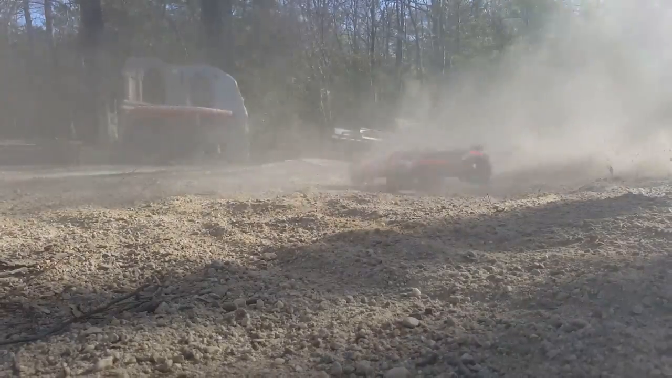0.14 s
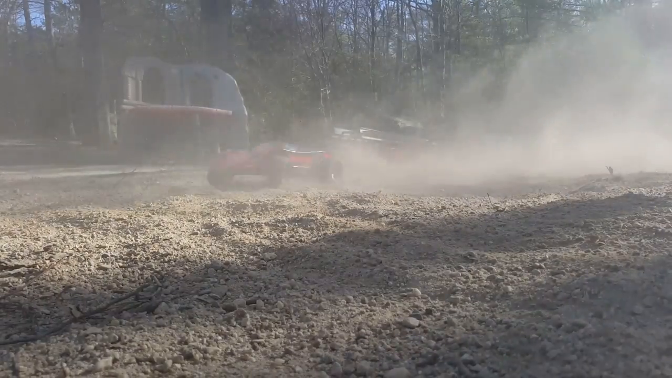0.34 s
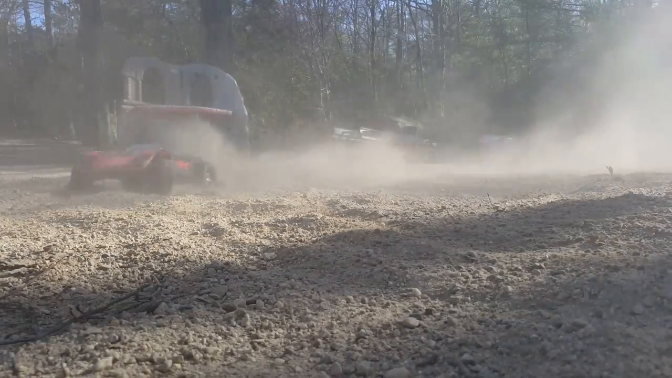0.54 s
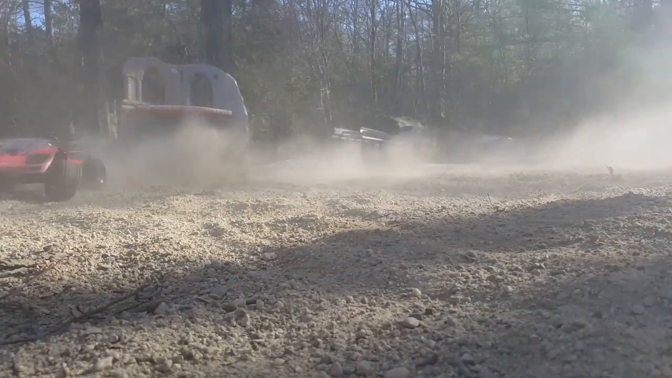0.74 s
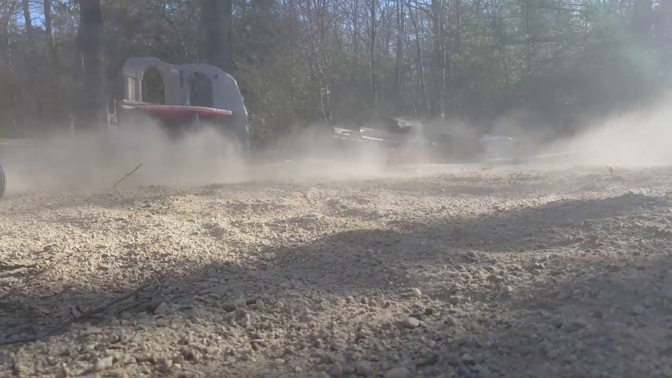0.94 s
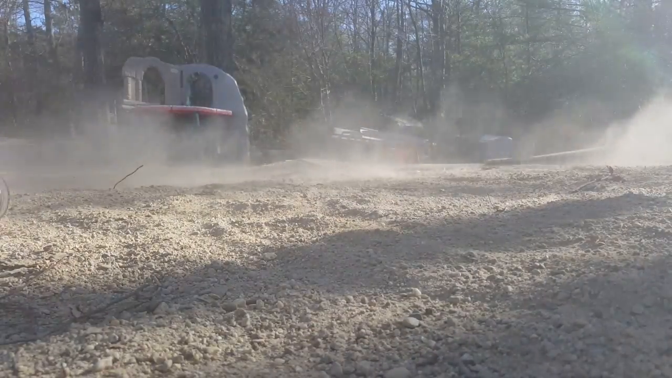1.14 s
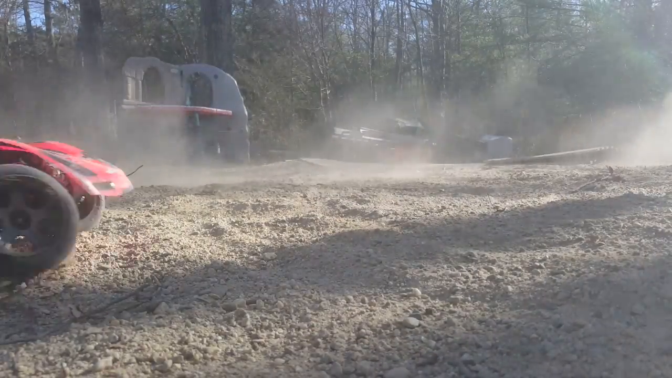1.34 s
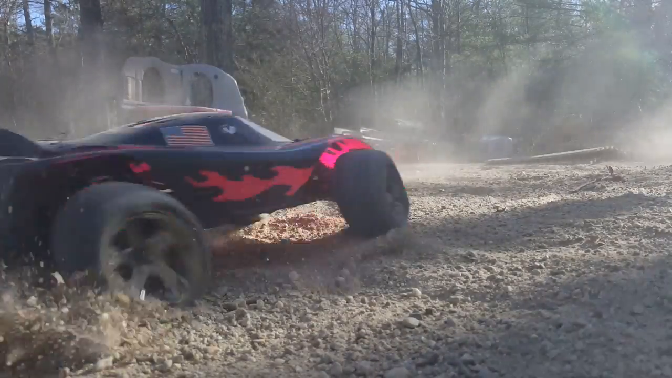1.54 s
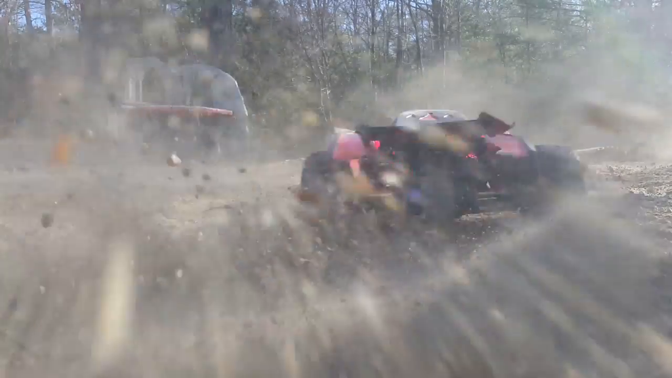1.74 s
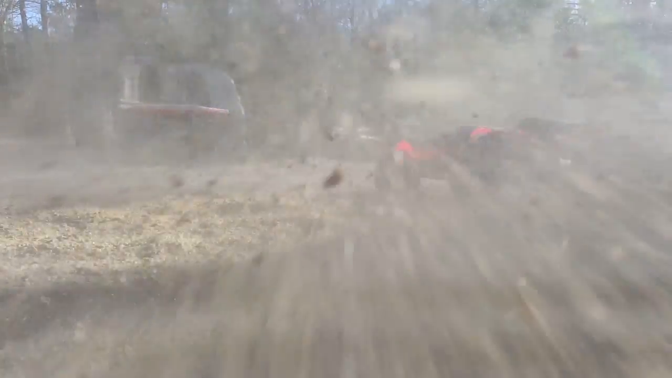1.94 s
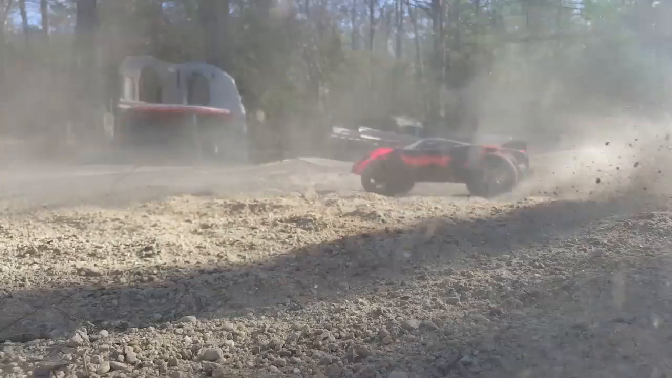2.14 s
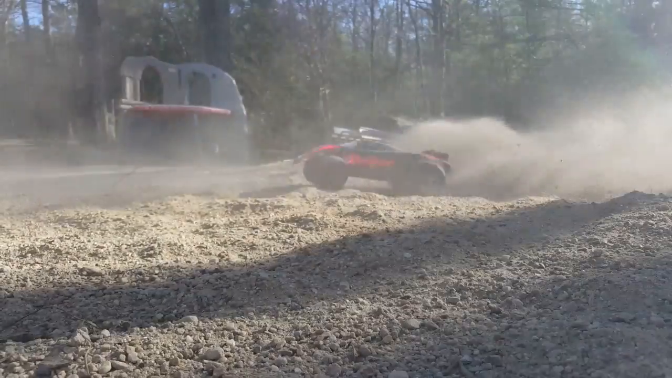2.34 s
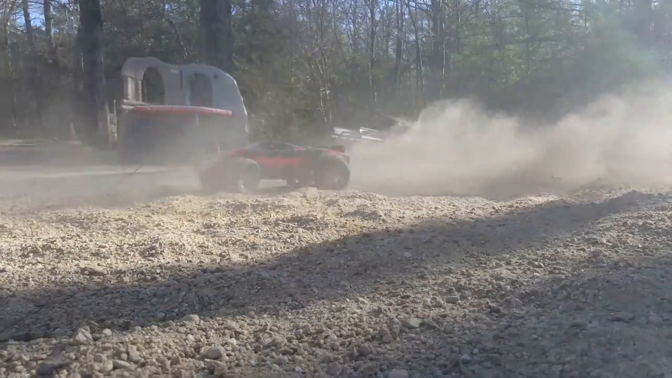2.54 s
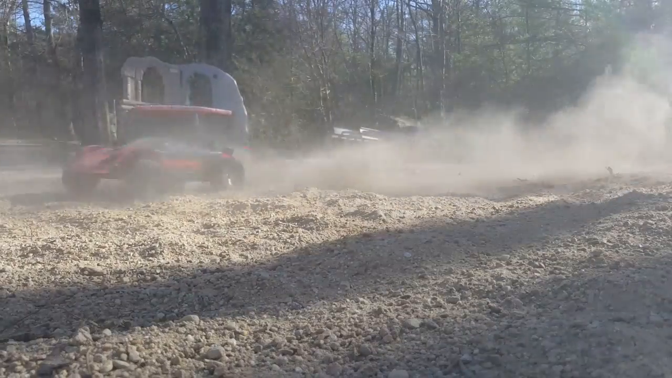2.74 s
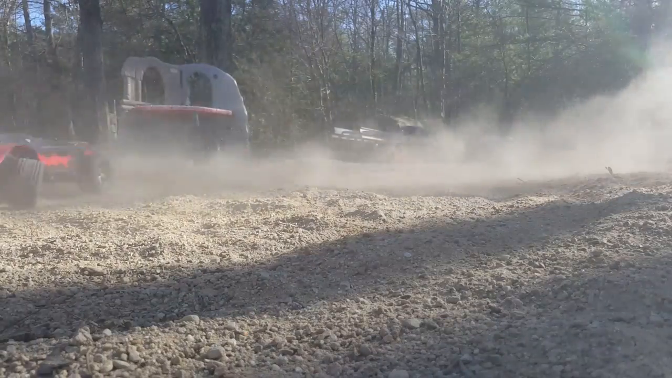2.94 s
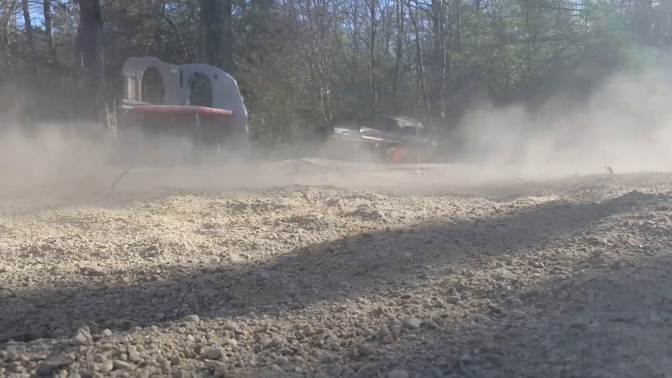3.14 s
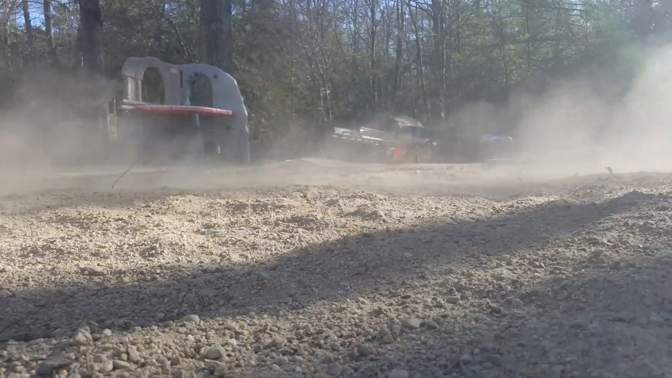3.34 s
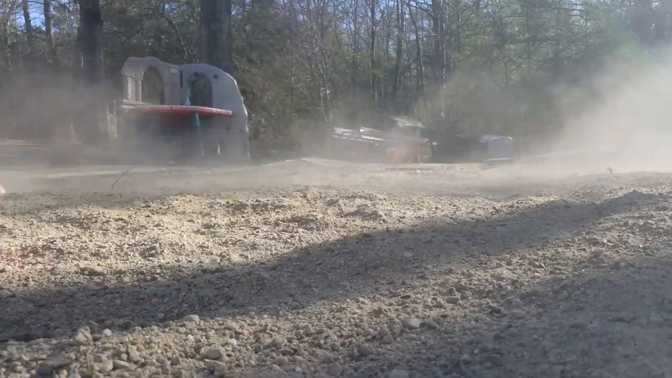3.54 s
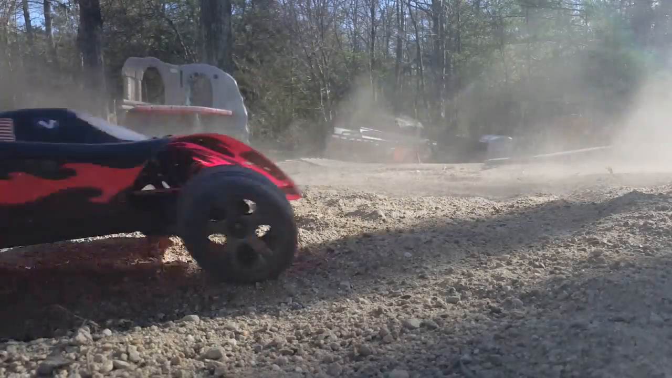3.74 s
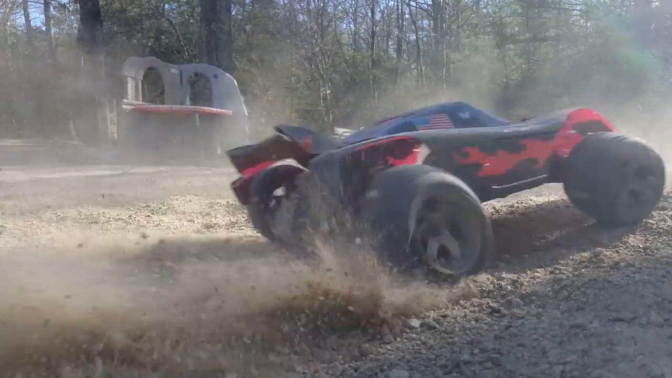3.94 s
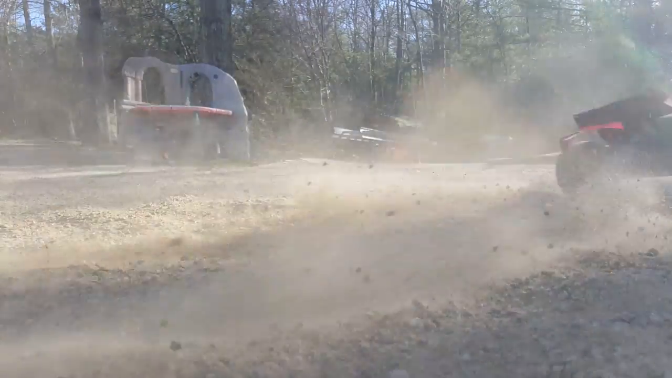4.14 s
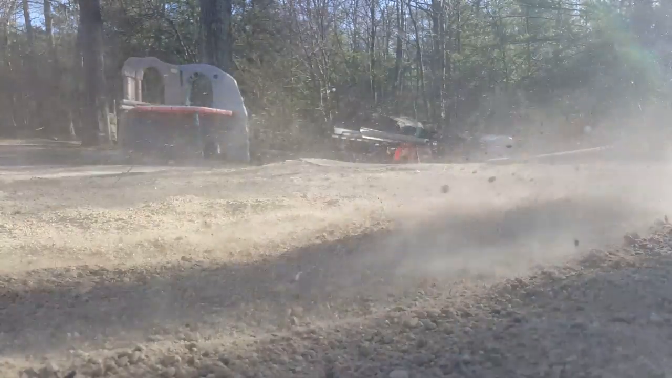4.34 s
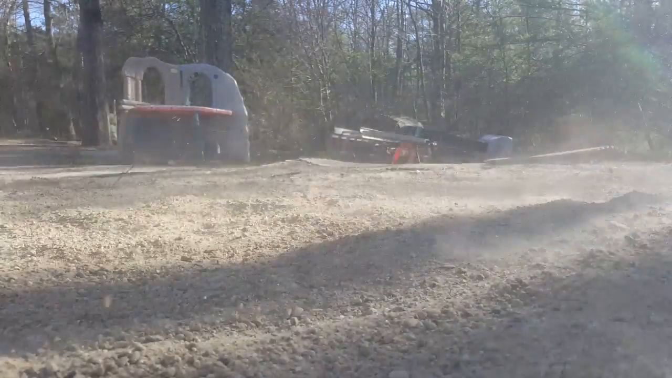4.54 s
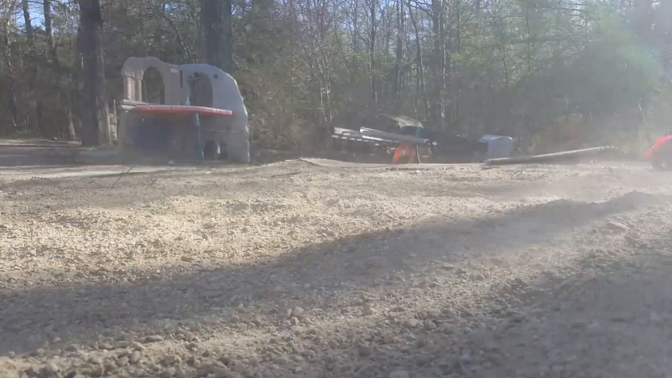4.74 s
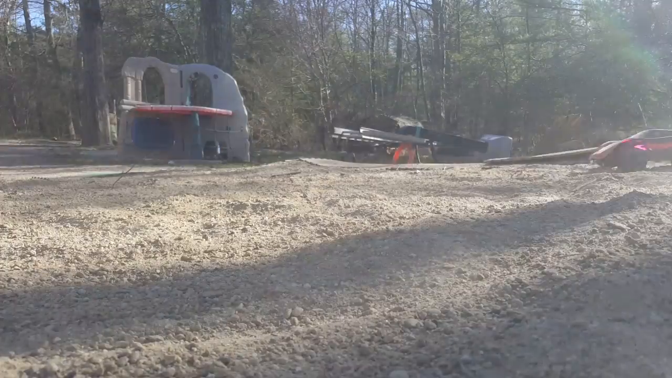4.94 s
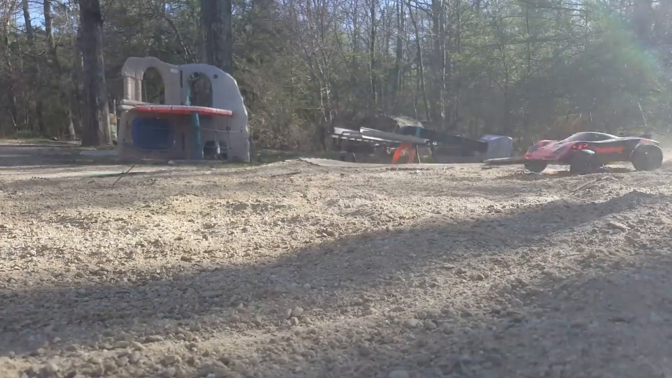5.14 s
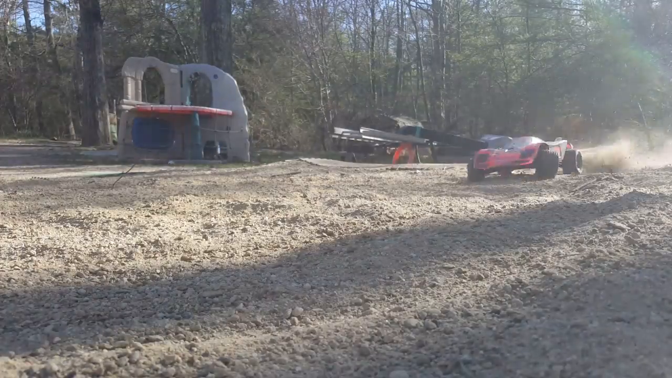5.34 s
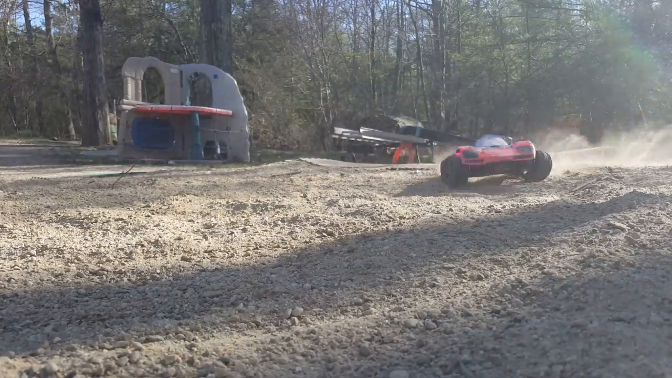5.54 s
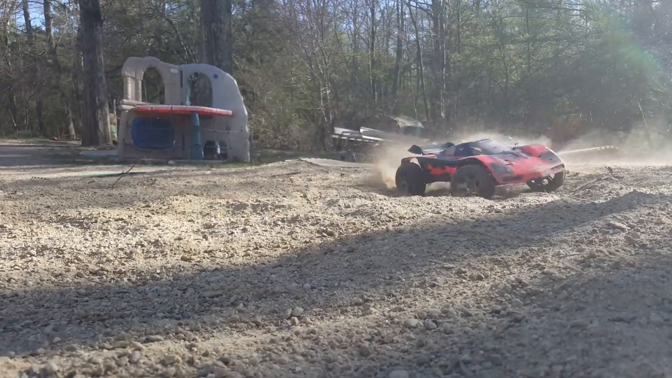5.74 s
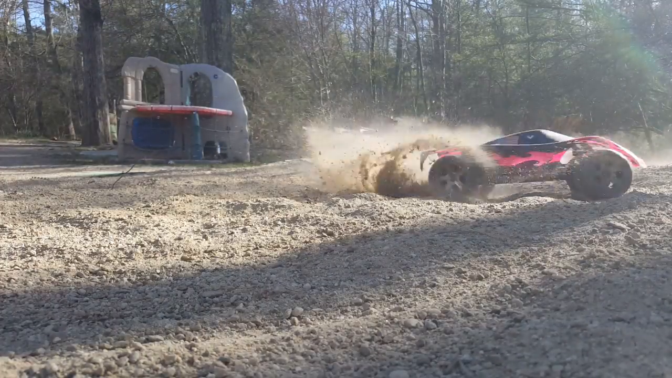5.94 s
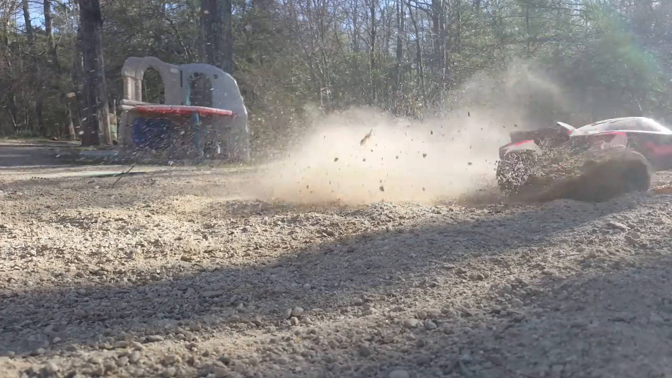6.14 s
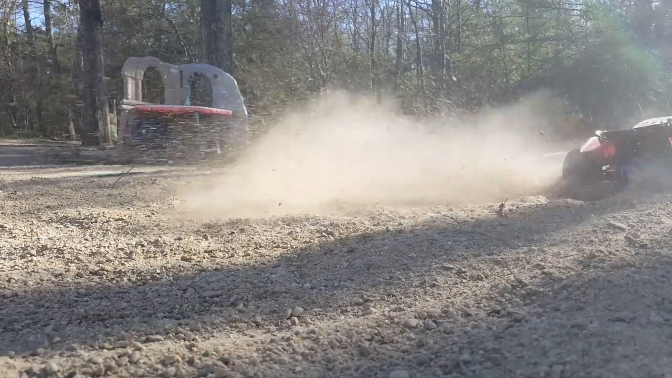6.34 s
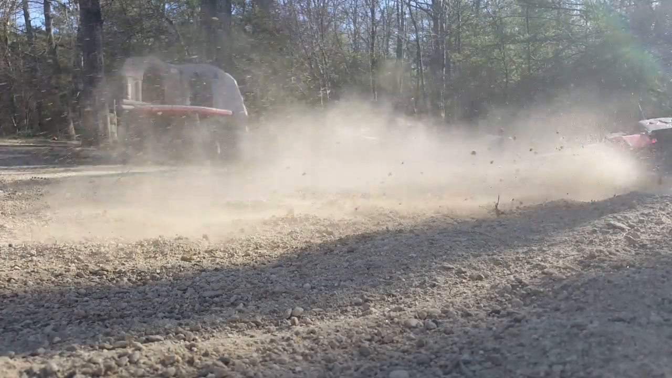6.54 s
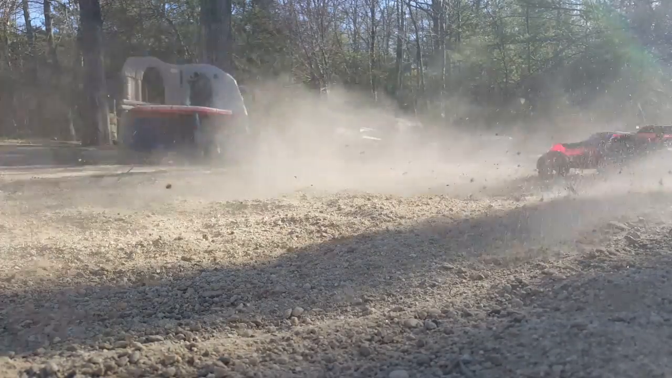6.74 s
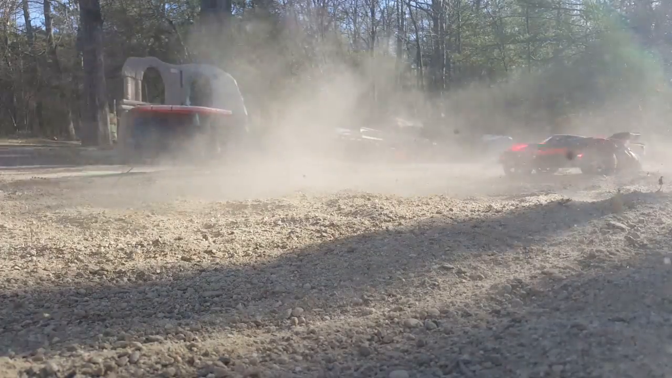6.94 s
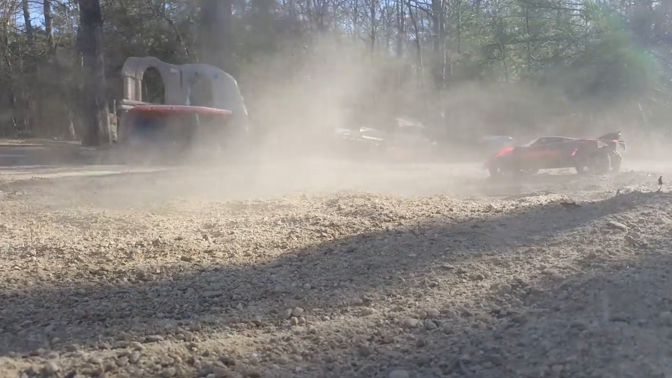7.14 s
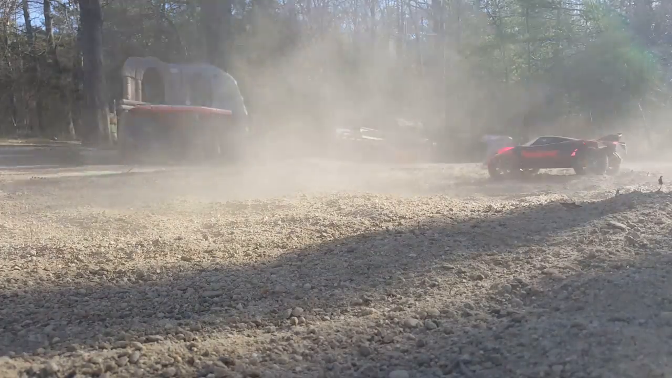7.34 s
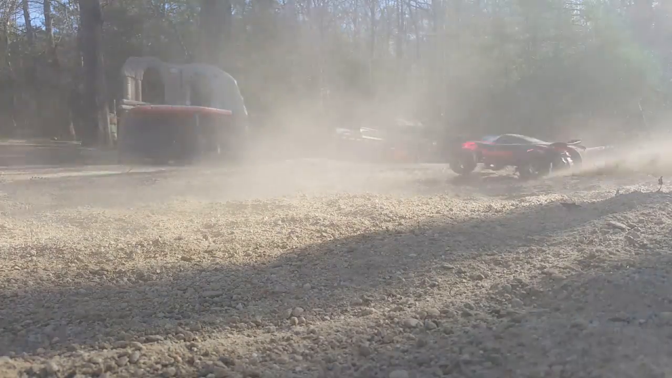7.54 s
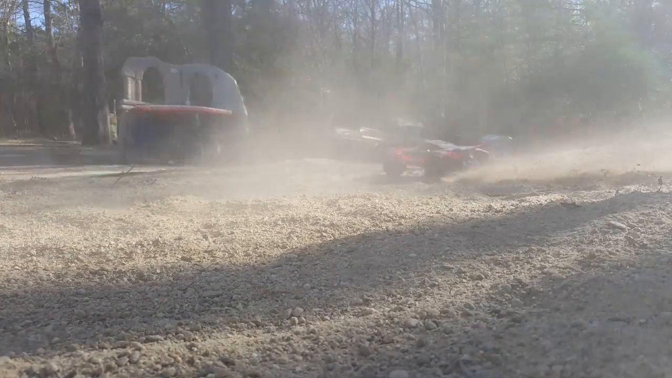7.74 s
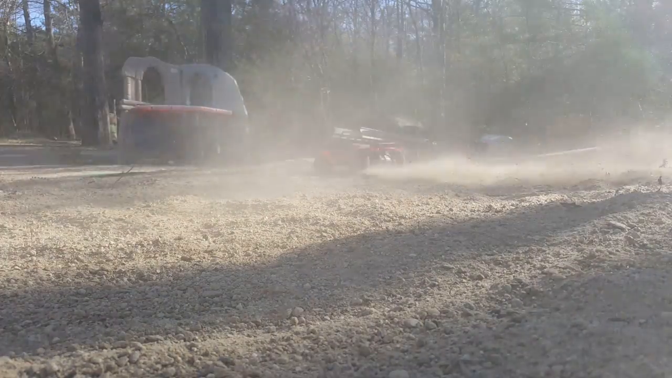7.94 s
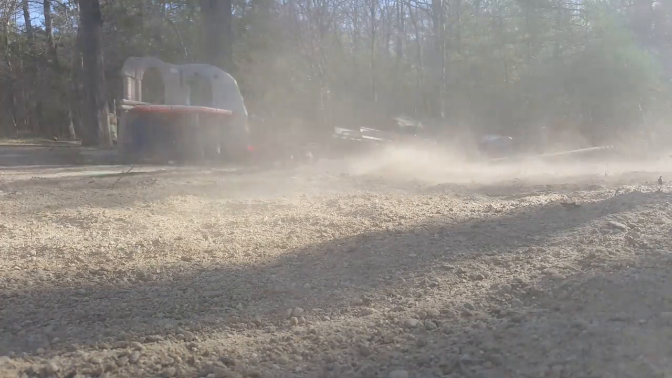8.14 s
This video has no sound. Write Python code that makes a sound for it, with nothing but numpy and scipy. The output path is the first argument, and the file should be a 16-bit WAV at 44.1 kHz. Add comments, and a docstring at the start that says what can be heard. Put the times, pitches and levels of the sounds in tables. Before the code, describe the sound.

A toy electric truck's high, gritty gear whine flutters as it slides round on loose gravel, tyres crunching and the plastic shell drumming. It comes very close to the ground-level stereo microphone, pelting it with sharp clicks and knocks, circles out and back, then cuts power to a low creep. Short throttle bursts follow, one rising steeply with flying grit and ticking pebbles, then a drop and a final shrill pull-away in open, dry air.

```python
"""On a gravel yard, a radio-controlled electric truck slides in circles, twice right past a phone on the
ground, then coasts and pulls away again. Meshing gear teeth whine and rattle with the throttle; random
grain collisions make the tyres' crunch and flying grit. Thrown stones, as decaying modes with a noisy
crack, strike the phone and the ground around it. Light air rumbles independently on two microphone ports."""
import sys
import numpy as np
from scipy import signal
from scipy.fft import rfft, irfft, next_fast_len
from scipy.io import wavfile
from scipy.ndimage import uniform_filter1d, minimum_filter1d, map_coordinates

SR = 44100
rng = np.random.default_rng(int(sys.argv[2]) if len(sys.argv) > 2 else 0)


def wav_out(sig):
    """Save sig, one row per channel (or a flat mono array), as 16-bit PCM at SR to the path in sys.argv[1]."""
    wavfile.write(sys.argv[1], SR, np.round(np.clip(np.atleast_2d(sig).T, -1, 1) * 32767).astype(np.int16))


N = 361619
T = np.arange(N) / SR  # time in seconds

# Teeth on the spur gear that meets the motor's pinion, and on the differential's drive gear.
SPUR_TEETH, DIFF_TEETH = 53, 13
CRUISE_HZ = 6500  # whine frequency at cruising speed
TOP_HZ = 16100    # upper edge of the sound

# Motor speed in circles, sagging as the tyres bite. Each row: time in seconds, pinion whine in Hz.
CIRCLING_SPEED = [(0.0, 6211), (0.06, 5981), (0.09, 6837), (0.15, 6759), (0.2, 5943), (0.25, 6600),
                  (0.37, 5880), (0.4, 6587), (0.5, 6760), (0.53, 6070), (0.62, 7514), (0.68, 5550),
                  (0.76, 6820), (0.8, 7040), (0.86, 6050), (1.06, 6980), (1.09, 6500), (1.32, 6990),
                  (1.4, 5970), (1.49, 6250), (1.52, 6950), (1.68, 6140), (1.72, 6710), (1.85, 6010),
                  (2.04, 7500), (2.09, 6440), (2.15, 6880), (2.46, 6421), (2.5, 5978), (2.54, 6530),
                  (2.69, 6961), (2.76, 6250), (2.82, 7030), (2.88, 6210), (2.96, 7110), (3.02, 5744),
                  (3.1, 7351), (3.15, 6230), (3.23, 6970), (3.28, 6220), (3.4, 6945), (3.51, 6839),
                  (3.56, 5920), (3.6, 6520), (3.7, 5770), (3.82, 6930), (3.95, 6054), (4.02, 6540),
                  (4.07, 5484), (4.15, 6650), (4.2, 6485), (4.27, 7237)]
# Motor speed as it coasts, creeps, dashes past, stops and pulls away.
# Each row: time in seconds, pinion whine in Hz.
DASHING_SPEED = [(4.309, 5700), (4.37, 2000), (4.405, 2300), (4.45, 1900), (4.55, 2400), (5.059, 2198),
                 (5.136, 3370), (5.243, 3050), (5.335, 3923), (5.45, 2250), (5.497, 1600), (5.59, 4802),
                 (5.661, 6664), (5.698, 8970), (5.795, 10680), (5.975, 5900), (6.059, 8710), (6.11, 8755),
                 (6.152, 6836), (6.29, 5520), (6.356, 6705), (6.466, 4544), (6.513, 4322), (6.644, 6226),
                 (6.732, 4322), (6.9, 2392), (7.2, 900), (7.31, 250.7), (7.36, 1499), (7.441, 2500),
                 (7.508, 6595), (7.574, 9090), (7.71, 10440), (7.8, 10700), (7.857, 9080), (7.925, 10620),
                 (8.101, 11020), (8.161, 9240), (8.2, 9700)]
# Position of the truck. Each row: time in seconds, distance in m, lag of the left port behind the right
# in ms, how squarely the gearbox faces the phone in dB.
TRUCK_PATH = [(0, 5.5, .27, -0.5), (.23, 4.9, 0.13, -1), (.5, 2.7, -0.085, -1.5), (.85, 2.17, -.24, -3),
              (1.05, 1.91, -0.35, -3), (1.4, 1.2, -0.4, -1), (1.65, 1.7, -0.27, 7.5),
              (1.9, 3.16, 0.12, 1.5), (2.2, 4.47, 0.16, 0.5), (2.55, 6.4, 0.039, 3.5),
              (2.76, 4.4, -.11, 1.5), (2.9, 2.36, -0.18, -1.5), (3.3, 1.67, -0.37, -7.5),
              (3.52, 1.37, -0.42, 0.5), (3.87, 1.095, -0.38, 3), (4.2, 1.1, .24, 0.5),
              (4.42, 2.1, 0.33, -2.5), (4.7, 2.94, 0.35, 3.5), (5.3, 2.68, 0.23, 4.5),
              (5.65, 2.6, 0.134, -7.5), (5.95, 2.3, 0.088, 2), (6.2, 1.27, 0.18, 1), (6.5, 1.5, .26, -2.5),
              (6.65, 1.8, 0.26, -0.5), (7.5, 2.7, 0.22, -10.5), (8.2, 2.62, -0.0031, -9)]
# Squeezes of the throttle or brake. Each row: start in seconds, length in seconds, pinion level in dB,
# differential level in dB, flying grit level in dB.
THROTTLE_SQUEEZES = [(-.1, 4.39, 0, -2, -17.5), (4.357, .09, 5.5, -33, -20), (5.073, 0.28, -6, 3, -17),
                     (5.42, 0.099, 3.5, -22, -41), (5.527, 1.276, -2, 1.5, -11),
                     (7.344, 0.13, -16, -21, -31), (7.455, 0.74, 5, -0.5, -9)]
THROTTLE_ATTACK_S, THROTTLE_RELEASE_S = 0.024, 0.058
# Wheel hop, which unloads the gears. Each row: time in seconds, backlash as a factor.
WHEEL_HOP = [(0, 1.4), (4.2, 1.27), (4.4, 2.4), (5.5, 1.17), (5.7, 1), (6.15, 2.63), (6.4, 2.2),
             (6.85, 2.4), (7.5, 0.85), (7.7, 2), (8.2, 1.4)]
# Load on the differential, high where the tyres bite. Each row: time in seconds, level in dB.
DIFF_LOAD = [(0, -4), (.5, 1.5), (.87, 2), (1.1, -4), (1.45, 1), (1.6, -2.5), (1.78, 9), (2, -7.5),
             (2.6, -2.5), (3.35, -2), (3.85, 0.5), (4.1, 0), (4.3, 1.5), (5.1, 2.5), (5.8, 1.5),
             (6.08, 3.5), (6.22, -7.5), (6.35, -2), (6.65, -2), (6.8, -9.5), (7.48, 3.5), (7.6, 5),
             (8.2, -7)]

# Radiation of each gear's tone by the housing. Each row: frequency in Hz, level in dB.
PINION_RESPONSE = [(2000, -14.5), (3200, -17.5), (4500, -9.5), (5700, -5), (6500, 1), (7200, 0),
                   (8800, -3.5), (10500, -2)]
DIFF_RESPONSE = [(700, -11), (1200, -4), (1500, 1.5), (1720, -2), (2000, -0.5), (2600, -10)]
# Pitch preference of the two ports. Each row: frequency in Hz, left minus right in dB.
PORT_BALANCE = [(3000, 11), (6500, 3.5), (7300, 5.5), (8500, -10), (10500, -12)]

# Spectrum of the whine's second harmonic. Each row: frequency in Hz, relative level in dB per Hz.
OVERTONE_SPECTRUM = [(3000, -7.5), (6800, 7.5), (9000, 3), (11000, -0.5), (12200, 5.5), (13300, -19.5),
                     (14000, -5.5), (14400, 4), (14900, -10), (16000, 4.5)]
# Rattle through the resonant gearbox housing. Each row: frequency in Hz, relative level in dB per Hz.
HOUSING_SPECTRUM = [(2000, -43.5), (3800, -8), (5000, -18), (6500, -3.5), (7600, -7.5), (8800, -20.5),
                    (10500, -24.5), (12300, -17), (14000, -13.5), (16000, -24)]
# Clatter of loose shafts and gears. Each row: frequency in Hz, relative level in dB per Hz.
RATTLE_SPECTRUM = [(600, -19), (1200, 1.5), (1650, 5), (2200, 1), (3000, -5), (3600, -9.5), (5000, -11),
                   (6600, -10.5), (7600, -18.5), (9000, -44), (16000, -36)]
# Sand and stones leaving the tyres. Each row: frequency in Hz, relative level in dB per Hz.
GRIT_SPECTRUM = [(1000, -20), (2500, 2), (3700, -0.5), (5200, 7), (6200, 5.5), (7400, 12.5), (8400, 3),
                 (12000, -0.5), (16000, -1.5)]
# Tread blocks crunching gravel. Each row: frequency in Hz, relative level in dB per Hz.
TYRE_SPECTRUM = [(200, -21), (350, -9), (550, -2), (850, 2.5), (1200, -0.5), (1800, -10), (2600, -23.5),
                 (6000, -35)]
# Drumming of the plastic shell. Each row: frequency in Hz, relative level in dB per Hz.
SHELL_SPECTRUM = [(50, -28.5), (110, -10), (180, -5.5), (260, -1.5), (400, 1), (560, -2.5), (900, -25),
                  (2000, -55)]
# Ticks of landing grit. Each row: frequency in Hz, relative level in dB per Hz.
PEBBLE_SPECTRUM = [(200, -17), (700, 8), (2500, 3), (4500, 1), (7000, 7), (9000, -8), (16000, 3)]
# Air buffeting a port. Each row: frequency in Hz, relative level in dB per Hz.
WIND_SPECTRUM = [(20, -37), (45, -5), (70, 3.5), (110, -2.5), (200, -11.5), (600, -33)]
# Steady background of the yard. Each row: frequency in Hz, relative level in dB per Hz.
YARD_SPECTRUM = [(30, -5.5), (150, -3), (400, -30), (1000, -18.5), (2500, -11.5), (7000, -2),
                 (10000, -25.5), (16000, -35)]

# Air rumble. Each row: time in seconds, level in dB before a common gain.
AIR_RUMBLE = [(0.0, -70), (0.32, -67), (1.48, -52), (1.6, -63), (2.12, -39), (2.21, -64), (2.92, -54),
              (3.04, -39), (3.22, -54), (3.45, -47), (4.52, -55), (5.02, -41.5), (5.6, -62), (5.78, -44),
              (6.51, -58), (6.85, -43), (7.15, -57), (7.22, -42), (7.45, -69), (7.65, -56), (8.13, -47),
              (8.2, -43)]
# Jolts as the wheels land or grab the gravel. Each row: start in seconds, extra churn in dB
# against the rolling level.
WHEEL_JOLTS = [(.65, -6.5), (1.06, -3), (1.375, -6.5), (2.32, -6), (3.11, -4), (4.465, -7), (5.118, -10),
               (6.345, -4), (6.585, -3.5), (6.791, -2), (7.477, 2.5)]
JOLT_HOLD_S, JOLT_ATTACK_S, JOLT_RELEASE_S = 0.011, 0.004, 0.033
# Thrown stones. Each row: start in seconds, peak in dB before a common gain, thump in dB before a common
# gain, brightness in dB, left minus right in dB.
THROWN_STONES = [(0.6802, -11, -19, 4, -6), (1.5297, -4, -16, -9, 11), (1.818, 16, -30, -1, 15),
                 (1.824, -6, -10, -8, 43), (1.8447, 6, -22, 12, 22), (1.864, -6, -17, 5, 22),
                 (1.8733, -1.5, -15, 11, 12), (1.8893, -1, -17, 3, 14), (1.9131, 0, -7, 7, 8),
                 (1.916, -2.5, 2, -11, -20), (1.9252, -4, -14, 7, 13), (1.933, 2, -22, 16, 18),
                 (1.9784, 4, -15, -11, 17), (2.0419, 1, -23, 1, 23), (2.0519, -5, 5, 6, 10),
                 (2.059, -4, 3, 1, -22), (2.0647, 4, -18, 14, 12), (2.0742, 10, -24, 3, 17),
                 (2.0894, -3, -29, -15, -2), (2.0987, 3.5, -6, -24, -8), (2.1017, -1, 7, 1, 22),
                 (2.1077, -5, -19, 6, 18), (2.116, -2, -25, -16, 2), (2.129, -0.5, -28, 0, 12),
                 (2.134, -2, -10, -25, -9), (2.1444, -3.5, -18, 9, -16), (2.168, -5.5, -33, 12, 2),
                 (2.195, -3, -25, 12, 17), (2.333, -27, -10, -28, -8), (4.2161, -3.5, -21, 6, 2),
                 (4.467, -16.5, -21, -55, 5), (4.577, -17, -9, 10, 13), (4.67, -21, 0, -12, 3),
                 (6.412, -5.5, -18, 2, -6), (6.7931, -18, -24, -12, -5), (6.8696, -17, -17, 3, 2),
                 (6.9276, -8, -23, 15, 10), (6.9698, -12, -10, 1, 15), (6.9968, -6.5, -33, 17, 6),
                 (7.077, -16, -27, 4, 1), (7.087, -10.5, -33, 19, 13), (7.1432, -14, -29, -12, 9),
                 (7.2373, -26.5, -11, -26, 2), (7.2772, -36, -19, -7, 6), (7.3366, -22.5, -27, -25, 7)]
# Modes of a stone's knock. Each row: frequency in Hz before random detuning, 60 dB decay time in seconds,
# level in dB before the stone's brightness.
KNOCK_MODES = [(885, 0.018, -9.5), (1710, 0.0041, 4), (2480, 0.012, -6), (3780, 0.0091, 1.5),
               (6520, 0.0036, 8.5), (9200, 0.0027, -31.5), (13970, 0.0046, 3.5)]
# Grit thrown at the phone by the spinning tyres. Each row: start in seconds, length in seconds,
# spray level in dB, landing tick level in dB.
GRIT_SHOWERS = [(1.819, 0.095, -30.5, -38), (2.037, 0.099, -30.5, -43), (4.21, 0.058, -25, -40.5),
                (6.019, 0.09, -30, -55), (6.318, 0.45, -36.5, -41)]
SHOWER_ATTACK_S, SPRAY_RELEASE_S, LANDING_RELEASE_S = 0.023, 0.06, 0.24

# Reference levels in dB, before the laws of distance, speed, load and resonance.
PINION_DB, DIFF_DB, TYRE_DB, RATTLE_DB, GRIT_DB = -14, -21.5, -21.5, -25.5, -19.5
# Shares in dB that remain with the throttle off.
COAST_GEARS_DB, COAST_DIFF_DB, COAST_TYRES_DB = -15, -38.5, -9.5
# Rise of tyre noise per tenfold speed; fall per tenfold distance of the whine, which grazes the ground.
SPEED_LAW_DB, WHINE_FALL_DB = 16, 36.5
# Drumming against crunch at 1 m, and its fall per tenfold distance, in dB.
DRUM_DB, DRUM_FALL_DB = -3, 3.5


def undb(db):
    """An amplitude ratio is ten to the power of decibels over twenty."""
    return 10 ** (np.asarray(db) / 20)


def unit(x):
    """Root-mean-square normalisation gives a signal unit power."""
    return x / np.sqrt(np.mean(x ** 2))


def curves(table):
    """Linear interpolation turns each column of a table into a function of time."""
    s, *columns = np.transpose(table)
    return [np.interp(T, s, c) for c in columns]


def colour(x, points):
    """Spectral shaping: each frequency is weighted on a log-frequency curve, then scaled to rms 1."""
    hz, db = np.transpose(points)
    size = next_fast_len(N)
    f = np.maximum(np.fft.rfftfreq(size, 1 / SR), 1)
    gain = undb(np.interp(np.log(f), np.log(hz), db))
    return unit(irfft(rfft(x, size) * gain, size)[..., :N])


def walk(rate):
    """Smoothed random steps, changing rate times a second, give a fluctuation of rms 1."""
    k = max(int(SR / rate), 1)
    steps = np.repeat(rng.standard_normal(N // k + 1), k)
    return unit(uniform_filter1d(steps, k)[:N])


def grains(rate, spread_db):
    """Granular impact noise: random tiny collisions, many weak and a few strong."""
    size = undb(spread_db * np.minimum(rng.exponential(size=N), 2 * np.e))
    struck = rng.random(N) < rate / SR
    return struck * size * rng.standard_normal(N)


def swell(start, length, attack_s, release_s):
    """An envelope rises linearly, holds, then decays exponentially."""
    rise = np.clip((T - start) / attack_s, 0, 1)
    return rise * np.exp(-np.maximum(T - start - length, 0) / release_s)


def throttle():
    """Motor torque sets the drive (0-1) and the gains of the pinion, differential and flying grit."""
    total = 0
    for start, length, *db in THROTTLE_SQUEEZES:
        squeeze = swell(start, length, THROTTLE_ATTACK_S, THROTTLE_RELEASE_S)
        total = total + np.outer([1, *undb(db)], squeeze)
    drive, *gains = total
    return np.minimum(drive, 1), *gains


def response(hz, points):
    """Resonance: the level in dB of a gliding tone follows a body's response at its frequency."""
    at_hz, db = np.transpose(points)
    return np.interp(np.log(hz), np.log(at_hz), db)


def pinion(turn, slack, wobble=0.55, sway=1.0, throb=0.21, slip=0.47, flutter_db=1.0,
           chatter_db=-14, skirt_db=-22, second_db=-23, side_db=-28):
    """Gear mesh on a slightly eccentric spur gear: backlash and bumps modulate its phase and force."""
    # the drive joints sway the speed about every second turn of the spur gear
    swaying = sway * np.sin(turn / 2 + 2.3 * walk(25))
    jitter = slack * (slip * walk(260) + 1.38 * walk(45))
    eccentric = wobble * np.sin(turn + 1.0 * walk(30)) * (0.44 + 0.36 * walk(13))
    mesh = SPUR_TEETH * turn + eccentric + swaying + jitter
    flutter = undb(np.sqrt(slack) * (flutter_db * walk(90) + 2.0 * walk(30)))
    force = (1 + throb * np.sin(turn + 1)) * flutter
    second = colour(np.sin(2 * mesh + 1.6 * walk(700)), OVERTONE_SPECTRUM)
    tone = np.sin(mesh) + slack * undb(second_db) * second
    # the differential's teeth pulse the load and put weak lines under the whine
    for order, db in ((1, side_db + 6), (2, side_db + 0.5)):
        tone = tone + undb(db) * np.sin(mesh - order * DIFF_TEETH * turn - turn + walk(400))
    # uneven tooth impacts spread a narrow and a wide skirt round the line
    for rate, db in ((800, chatter_db), (2500, skirt_db)):
        skirt = walk(rate) * np.sin(mesh) + walk(rate) * np.cos(mesh)
        tone = tone + slack * undb(db) * skirt / np.sqrt(2)
    skirt_power = slack ** 2 * (undb(2 * chatter_db) + undb(2 * skirt_db))
    return tone * force * np.sqrt(2 / (1 + skirt_power))


def differential(turn, hop, slip=0.18, flutter_db=3, second_db=-15, third_db=-21):
    """Bevel-gear mesh two octaves lower: phase noise grows with harmonic order and with wheel hop."""
    mesh = DIFF_TEETH * turn + hop ** 2 * slip * walk(300) + 0.86 * walk(40)
    second = undb(second_db) * np.sin(2 * mesh + walk(500))
    third = undb(third_db) * np.sin(3 * mesh + 2 * walk(600))
    tone = np.sin(mesh) + second + third
    return unit(tone * undb(flutter_db * walk(120)))


def rattle(turn, spectrum, depth=0.11):
    """Impact noise of loose shafts and gears, modulated to be hardest once a turn."""
    strength = (1 + depth * np.sin(turn)) * undb(2.2 * walk(60))
    return colour(grains(12000, 1.4) * strength, spectrum)


def grit():
    """Granular ejection: sand and small stones fly off the tyres in irregular spurts."""
    spurts = undb(3.3 * walk(45))
    return colour(grains(9000, 2.9) * spurts, GRIT_SPECTRUM)


def tyres(drum_db, lumps_db=2.24):
    """Granular excitation: tread blocks crunch the gravel and drum the plastic shell."""
    bumps = undb(lumps_db * walk(55))
    drum = undb(drum_db)
    crunch = colour(grains(6000, 1.5) * bumps, TYRE_SPECTRUM)
    drumming = colour(grains(5000, 2.2) * bumps, SHELL_SPECTRUM)
    return (crunch + drum * drumming) / np.sqrt(1 + drum ** 2)


def delayed(x, lag_s):
    """Propagation delay: a sound is read at a moving lag by cubic interpolation."""
    return map_coordinates(x, [(T - lag_s) * SR], order=3, mode="nearest")


def ports(x, lag_ms, pan_db):
    """Differences of arrival time and level between two ports place a source to one side."""
    half_s = lag_ms / 2000
    gains = undb(np.array([pan_db, -pan_db]) / 2)
    pair = np.array([delayed(x, half_s), delayed(x, -half_s)])
    return pair * gains / np.sqrt(np.mean(gains ** 2, axis=0))


def spread(source, gain, lag_ms, pan_db, wide_db):
    """Partial coherence: a gritty source comes from the truck and, unlike at each port, from all round."""
    wide = undb(wide_db) * np.array([source(), source()])
    direct = ports(source() * gain, lag_ms, pan_db)
    return (direct + wide * gain) / np.sqrt(1 + undb(2 * wide_db))


def scatter(x, t60_s):
    """Diffuse reflection: convolution with decaying noise, different at each port."""
    t = T[:SR // 2]
    tail = rng.standard_normal((2, len(t))) * np.exp(-np.log(1000) * t / t60_s)
    tail = tail / np.sqrt(np.sum(tail ** 2, axis=1, keepdims=True))
    return signal.fftconvolve(x, tail, axes=1)[:, :N]


def outdoors(air_gain_db=-2, yard_db=-61):
    """Turbulence: light air buffets each port on its own, over the faint rush of the trees."""
    air_db, = curves(AIR_RUMBLE)
    gusts_db = 3.5 * walk(12)
    air = colour(rng.standard_normal((2, N)), WIND_SPECTRUM)
    trees = colour(rng.standard_normal((2, N)), YARD_SPECTRUM)
    return air * undb(air_db + air_gain_db + gusts_db) + undb(yard_db) * trees


def jolts():
    """Transient contact force raises the gain of the churn as the wheels hit and settle."""
    extra = sum(undb(db) * swell(s, JOLT_HOLD_S, JOLT_ATTACK_S, JOLT_RELEASE_S) for s, db in WHEEL_JOLTS)
    return 1 + extra


def stones(crack_s=0.00029, crack_db=4, tail_s=0.0024, tail_db=-9, thump_hz=230, thump_s=0.0022,
           thump_db=-5, gain_db=-2, highpass_hz=105):
    """Modal impact: each stone gives a crack, a gritty knock and a thump, strong where it hits the case."""
    out, t = np.zeros((2, N + SR)), T[:SR // 20]
    hz, t60, db = np.transpose(KNOCK_MODES)[:, :, None]
    for s, peak_db, low_db, bright_db, pan_db in THROWN_STONES:
        pitch = np.exp(0.14 * rng.standard_normal((2, len(KNOCK_MODES), 1)))
        # big, dull stones stay in contact longer than small, sharp ones
        contact = np.interp(bright_db, [-15, 5], [2.2, 1])
        scrape = np.exp(-t / (tail_s * contact)) * rng.standard_normal((2, len(t)))
        mode_gain = undb(db + bright_db * np.log10(hz / 3000))
        modes = mode_gain * np.exp(-np.log(1000) * t / t60) * np.sin(2 * np.pi * hz * pitch * t)
        crack = undb(crack_db) * np.exp(-t / crack_s) * rng.standard_normal((2, len(t)))
        burst = crack + undb(tail_db) * scrape
        # the scrape keeps feeding the knock for a moment
        knock = modes.sum(axis=1)
        knock = knock + 0.04 * signal.fftconvolve(knock, scrape, axes=1)[:, :len(t)]
        click = knock + undb(bright_db / 2) * burst
        thump_tone = np.sin(2 * np.pi * thump_hz * pitch[:, 0] ** 2 * t)
        thump = undb(thump_db + low_db) * np.exp(-t / thump_s) * thump_tone
        pan = undb(np.array([[pan_db], [-pan_db]]) / 2)
        hit = (click / np.abs(click).max() + thump) * pan
        i = int(s * SR)
        out[:, i:i + len(t)] += hit / np.abs(hit).max() * undb(peak_db + gain_db)
    highpass = signal.butter(2, highpass_hz, "high", fs=SR, output="sos")
    return signal.sosfilt(highpass, out[:, :N])


def showers():
    """Ballistic delay: the gain of grit landing lingers after that of the spray thrown at the phone."""
    spray, landing = 0, 0
    for s, length, spray_db, landing_db in GRIT_SHOWERS:
        spray = spray + undb(spray_db) * swell(s, length, SHOWER_ATTACK_S, SPRAY_RELEASE_S)
        landing = landing + undb(landing_db) * swell(s, length, SHOWER_ATTACK_S, LANDING_RELEASE_S)
    return spray, landing


def patter(rate=260, spread_db=1.5):
    """Sparse random impacts: small grit lands in lone ticks, some nearer each port."""
    left, right = (colour(grains(rate, spread_db), PEBBLE_SPECTRUM) for _ in range(2))
    return np.array([left + 0.5 * right, right + 0.5 * left])


def scene(housing_db=-17, shade_db_per_ms=-8, whine_shade_db_per_ms=-34, rattle_left_db_per_ms=8,
          near_db=-15, trees_db=-27, loose=1.7):
    """Superposition: speed, throttle and distance set the truck's layers; reflections, stones and air add."""
    whine_hz, = curves([*CIRCLING_SPEED, *DASHING_SPEED])
    metres, lag_ms, facing_db = curves(TRUCK_PATH)
    hop, = curves(WHEEL_HOP)
    load_db, = curves(DIFF_LOAD)
    drive, on_pinion, on_diff, digging = throttle()
    thrown, landing = showers()
    shaft_hz = whine_hz / SPUR_TEETH
    turn = 2 * np.pi * np.cumsum(shaft_hz) / SR

    # the gears sing under load, loudest where they meet a resonance
    power_db = 20 * np.log10(on_pinion + undb(COAST_GEARS_DB) * (1 - drive))
    pinion_db = PINION_DB + response(whine_hz, PINION_RESPONSE) + facing_db
    pinion_db = pinion_db - WHINE_FALL_DB * np.log10(metres) + power_db
    diff_db = DIFF_DB + load_db + response(DIFF_TEETH * shaft_hz, DIFF_RESPONSE)
    diff_gain = undb(diff_db) * (on_diff + undb(COAST_DIFF_DB)) / metres

    # the wheels grow louder with speed and dig in under power
    rolling = undb(SPEED_LAW_DB * np.log10(whine_hz / CRUISE_HZ)) / metres
    churning = rolling * jolts() * (drive + undb(COAST_TYRES_DB) * (1 - drive))

    # lightly loaded teeth bounce in their backlash; at low speed they touch only in chirps
    slack = hop * np.interp(pinion_db, [-38, -16], [loose, 1])
    chirps_db = np.interp(shaft_hz, [42, 58], [6, 0]) * (walk(35) - 0.5)

    # the phone shades the far port, more so in the treble
    side_db = shade_db_per_ms * lag_ms
    beam_db = whine_shade_db_per_ms * lag_ms + response(whine_hz, PORT_BALANCE)
    whine = ports(pinion(turn, slack) * undb(pinion_db + chirps_db), lag_ms, beam_db)
    whine += ports(differential(turn, hop) * diff_gain, lag_ms, side_db + 3.5)
    housing_gain = undb(pinion_db + housing_db)
    housing = spread(lambda: rattle(turn, HOUSING_SPECTRUM), housing_gain, lag_ms, side_db, wide_db=8.5)

    # the drivetrain rattles hardest while the truck is on the left, its gearbox side towards the phone
    clatter_gain = churning * undb(RATTLE_DB - rattle_left_db_per_ms * lag_ms)
    clatter = spread(lambda: rattle(turn, RATTLE_SPECTRUM), clatter_gain, lag_ms, side_db + 2.5, wide_db=-6.5)
    spray_gain = np.hypot(rolling * digging * undb(GRIT_DB), thrown)
    spray = spread(grit, spray_gain, lag_ms, side_db - 0.5, wide_db=10.5)
    drum_db = DRUM_DB - DRUM_FALL_DB * np.log10(metres)
    churn_gain = churning * undb(TYRE_DB)
    churn = spread(lambda: tyres(drum_db), churn_gain, lag_ms, 0.38 * side_db + 0.8, wide_db=-16.5)

    truck = whine + housing + clatter + spray + churn
    echoes = undb(near_db) * scatter(whine, 0.018) + undb(trees_db) * scatter(truck, 0.32)
    return truck + echoes + stones() + landing * patter() + outdoors()


def record(dry, ceiling=0.91):
    """Peak limiting by a smoothed gain holds down the loudest peaks, then a low-pass cuts the top."""
    size = SR // 200  # 5 ms
    needed = ceiling / np.maximum(np.abs(dry), ceiling)
    gain = uniform_filter1d(minimum_filter1d(needed, size, axis=1), size, axis=1)
    lowpass = signal.ellip(10, 0.2, 80, TOP_HZ, fs=SR, output="sos")
    return signal.sosfilt(lowpass, dry * gain)


dry = scene()
out = record(dry)
wav_out(out)
```